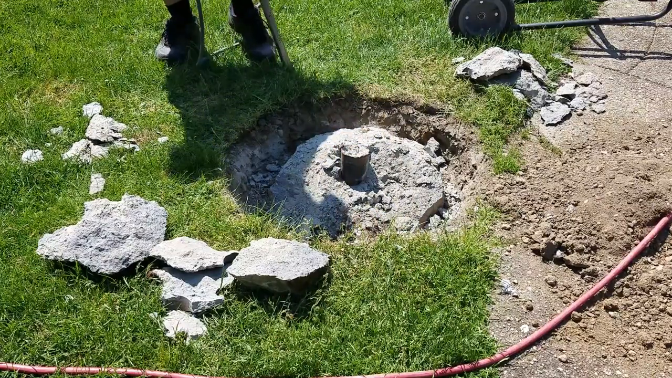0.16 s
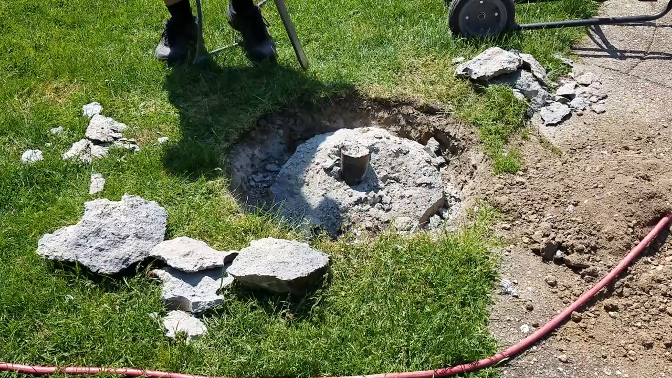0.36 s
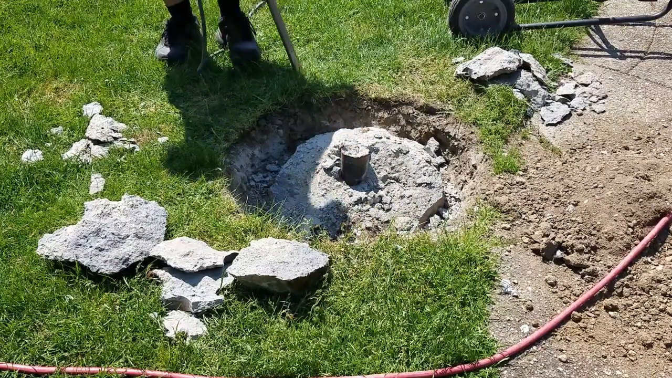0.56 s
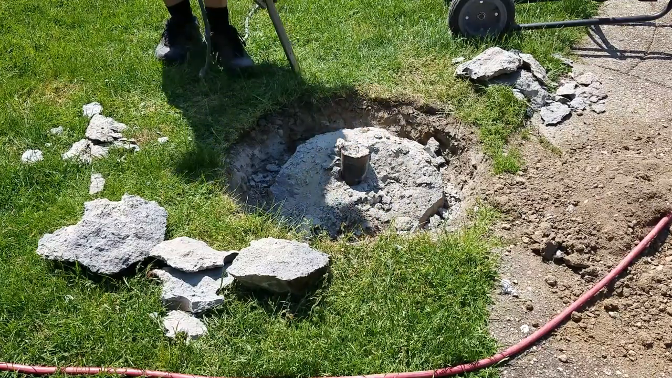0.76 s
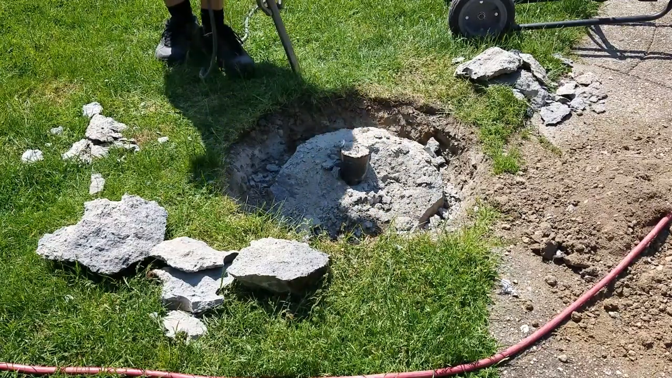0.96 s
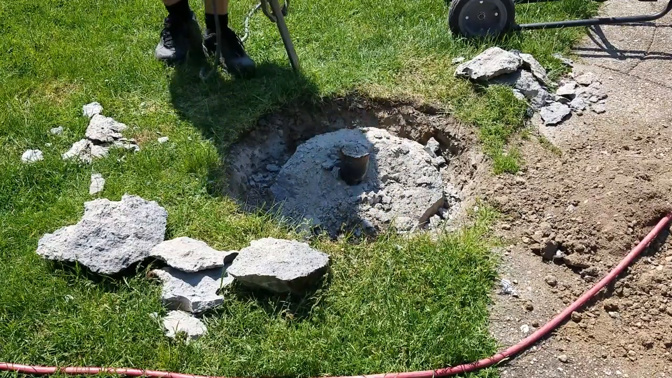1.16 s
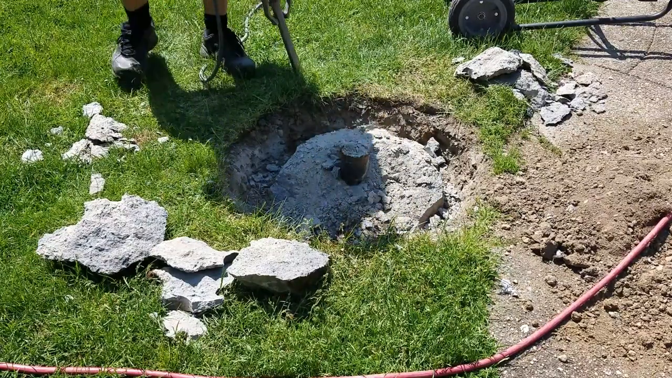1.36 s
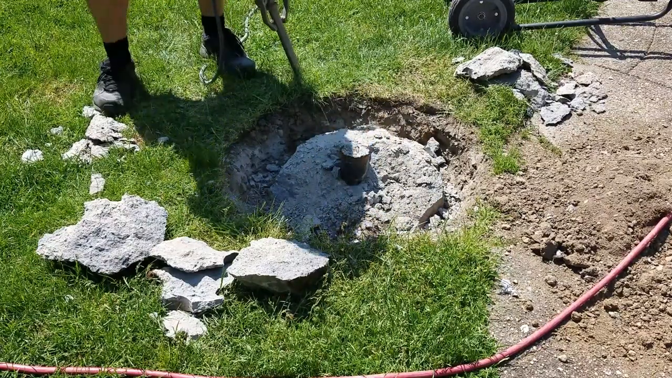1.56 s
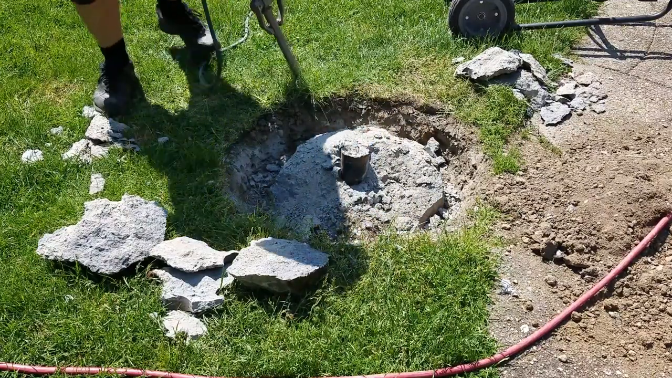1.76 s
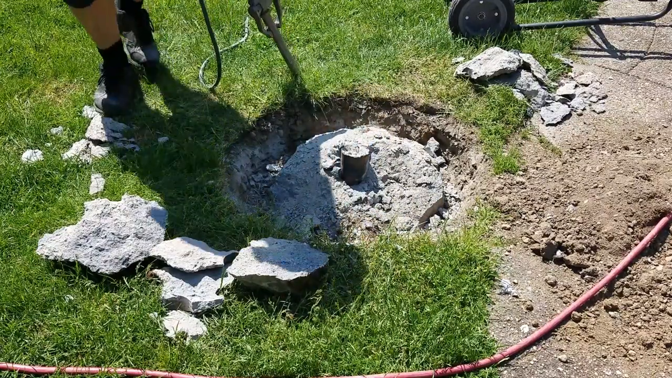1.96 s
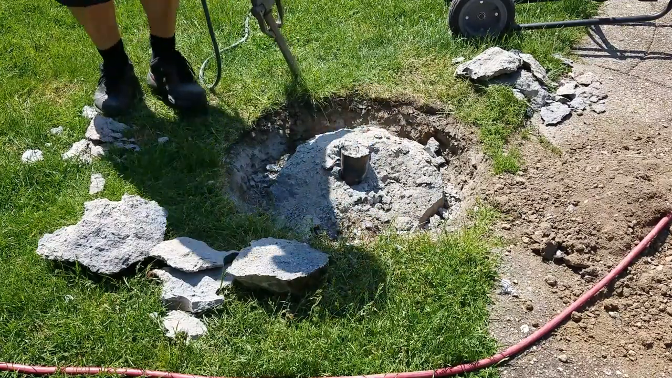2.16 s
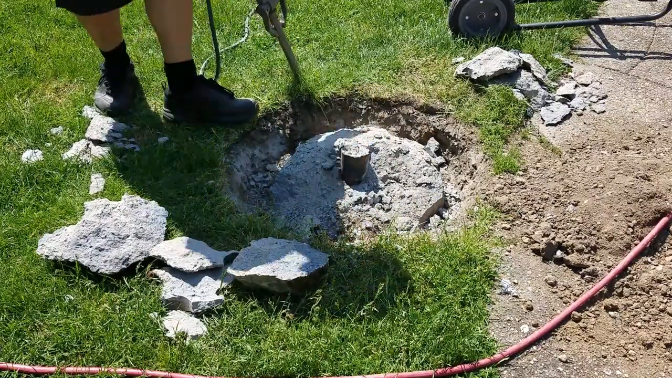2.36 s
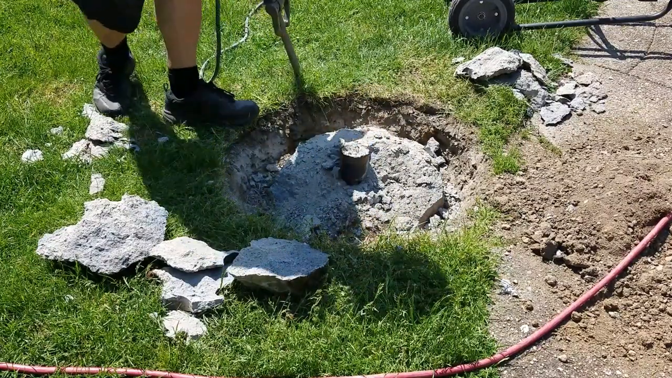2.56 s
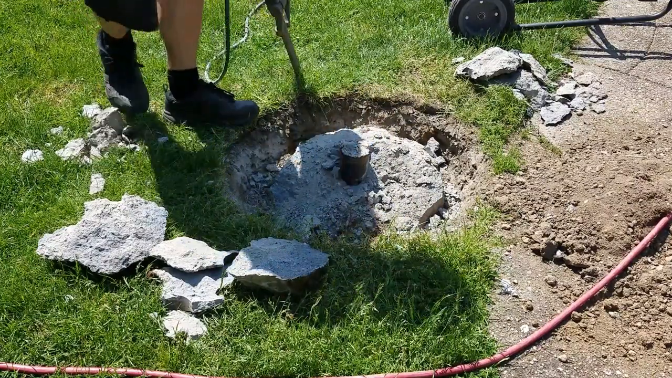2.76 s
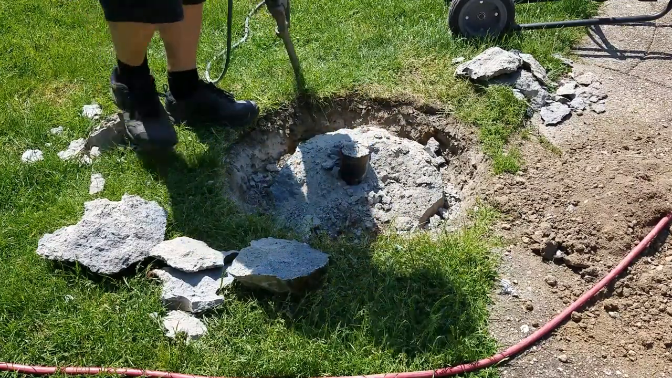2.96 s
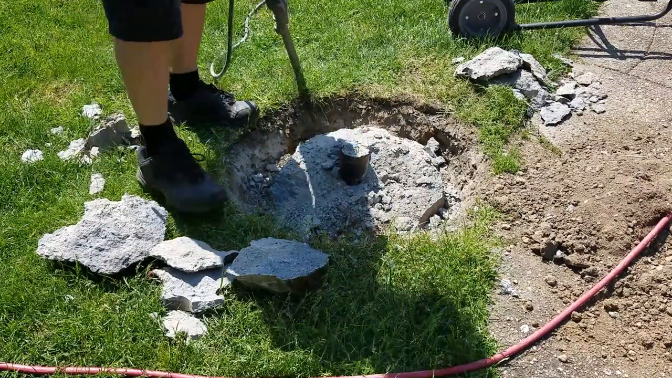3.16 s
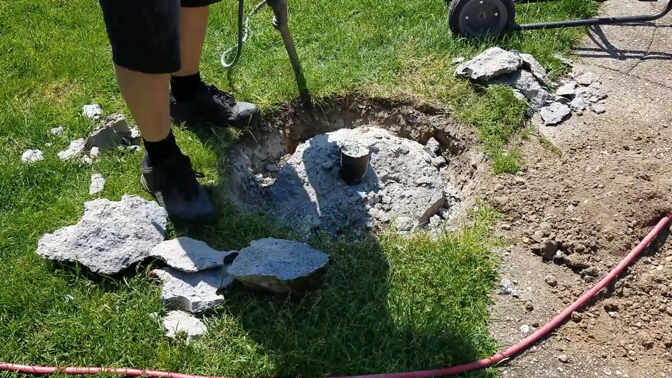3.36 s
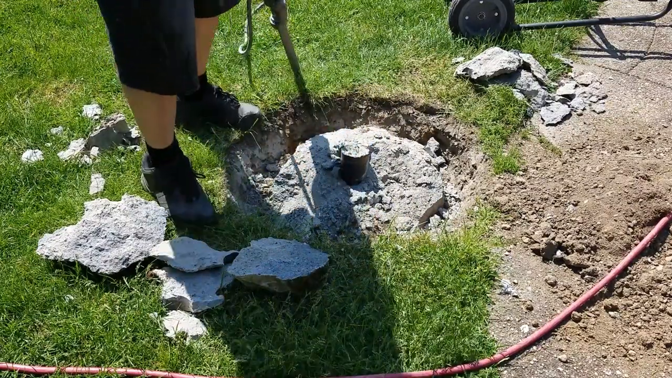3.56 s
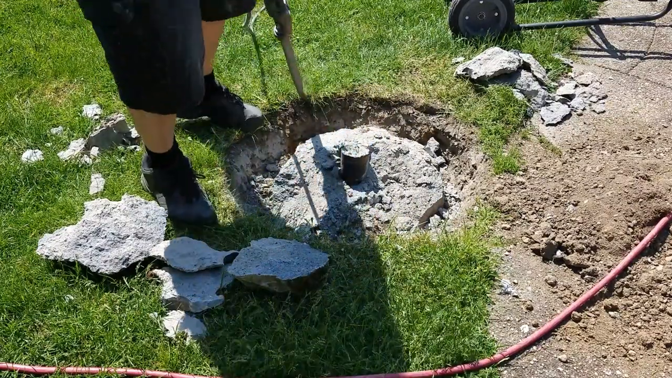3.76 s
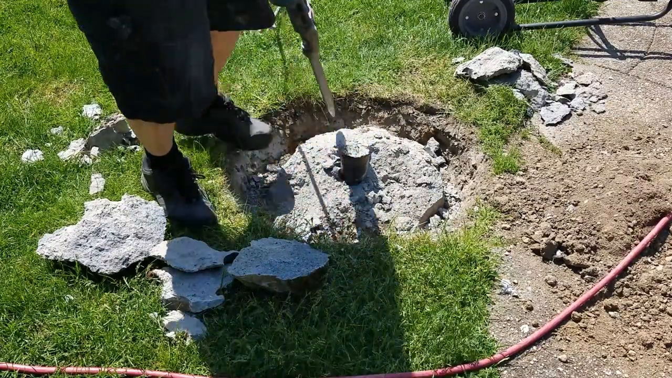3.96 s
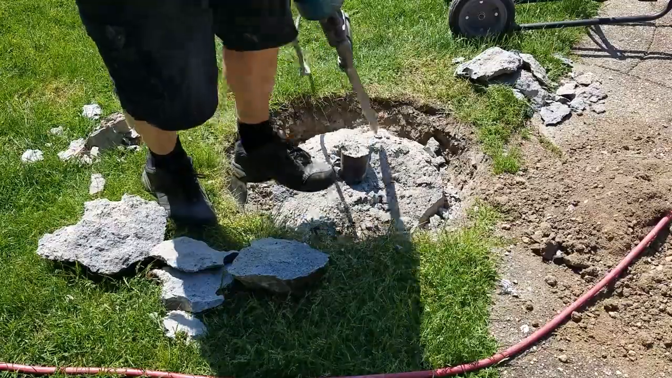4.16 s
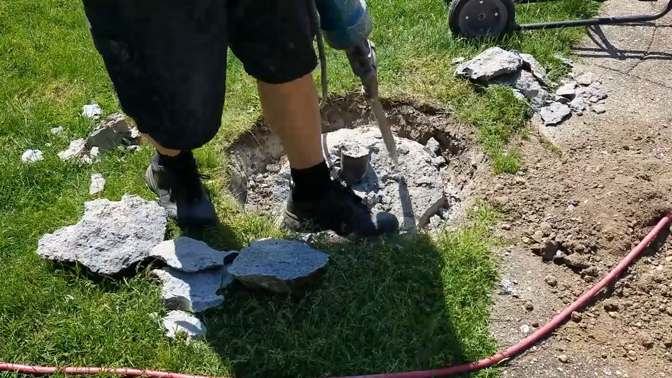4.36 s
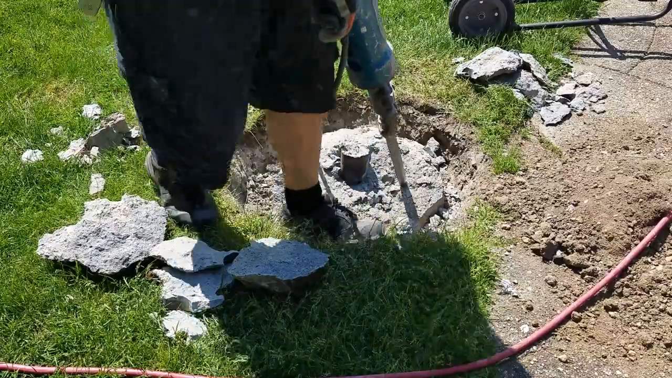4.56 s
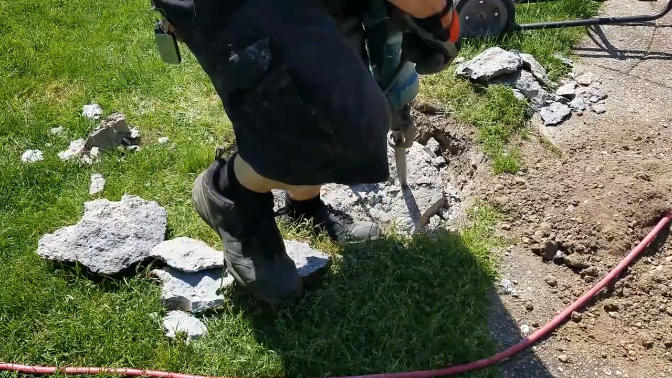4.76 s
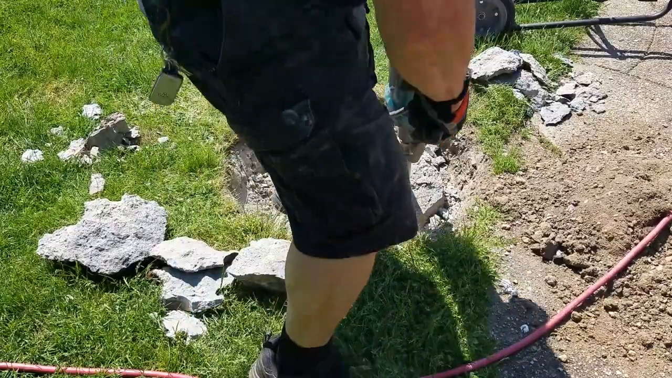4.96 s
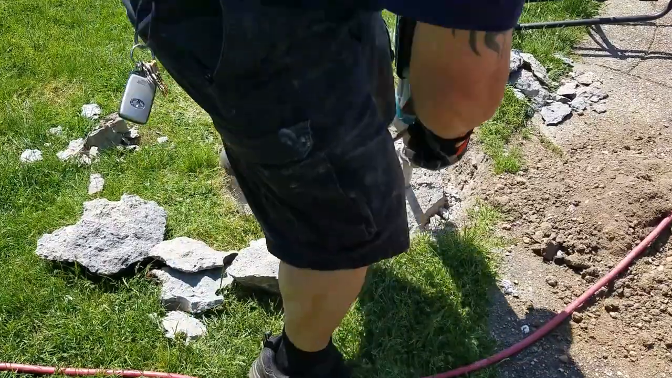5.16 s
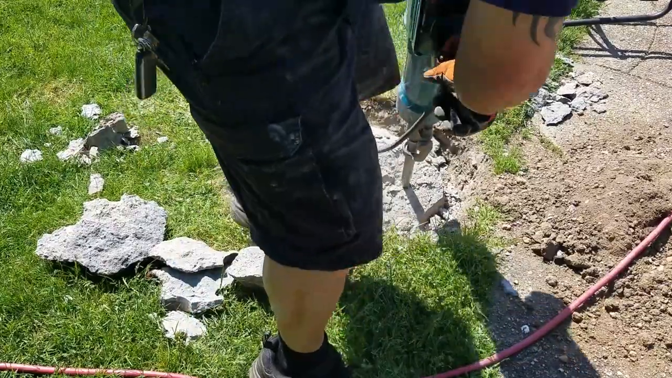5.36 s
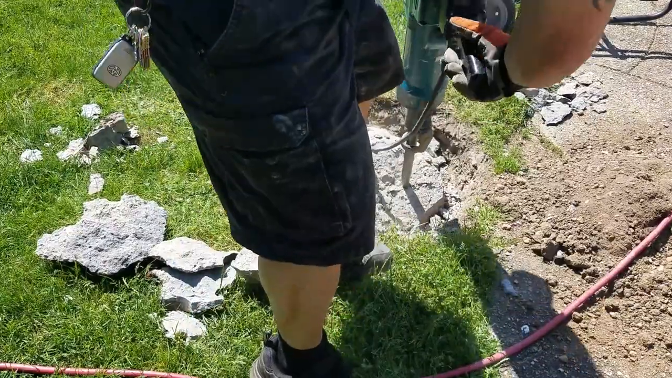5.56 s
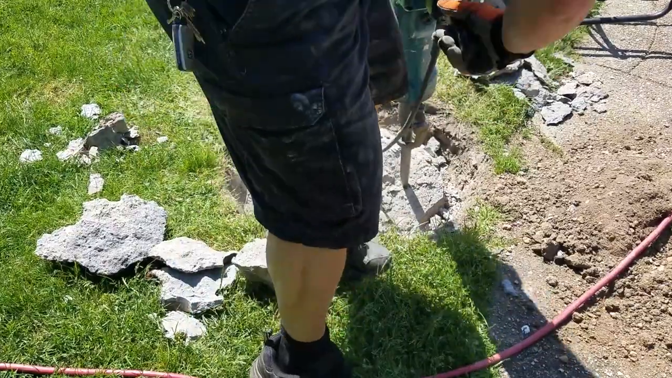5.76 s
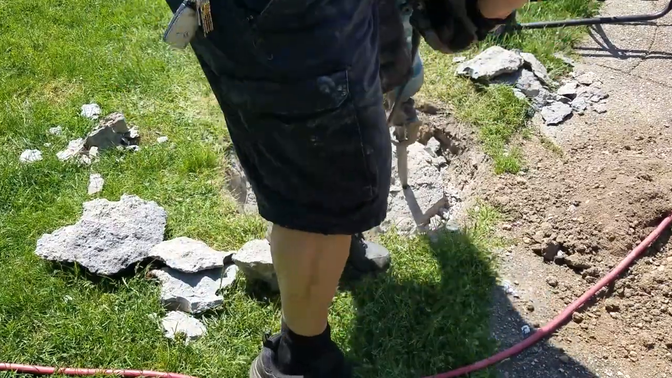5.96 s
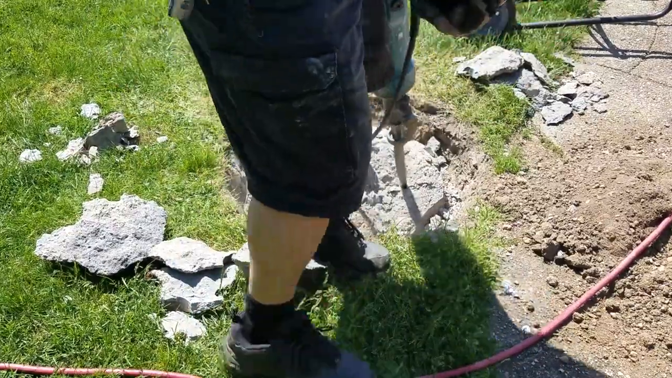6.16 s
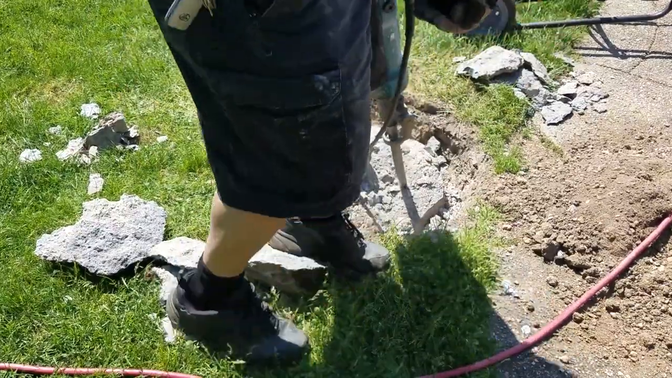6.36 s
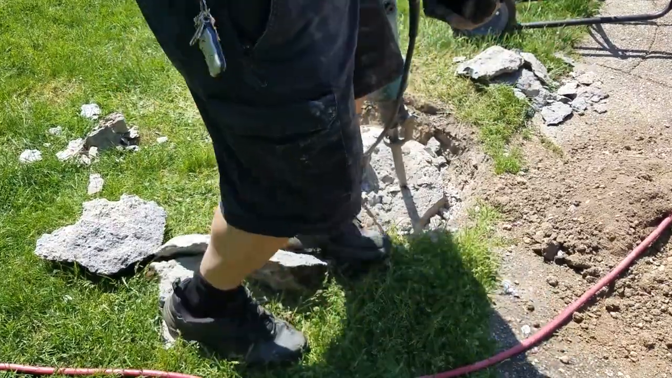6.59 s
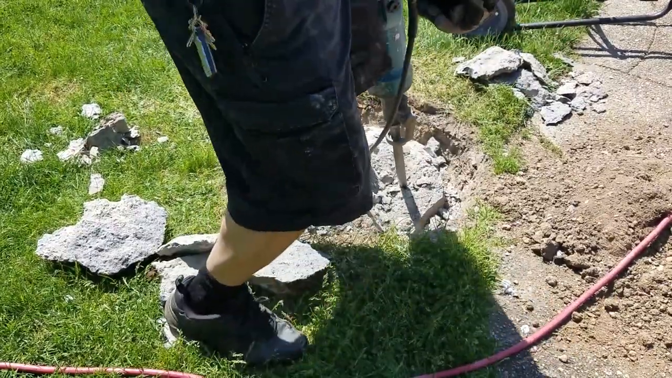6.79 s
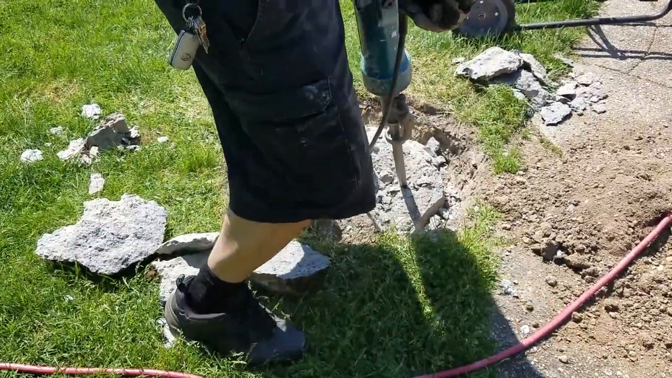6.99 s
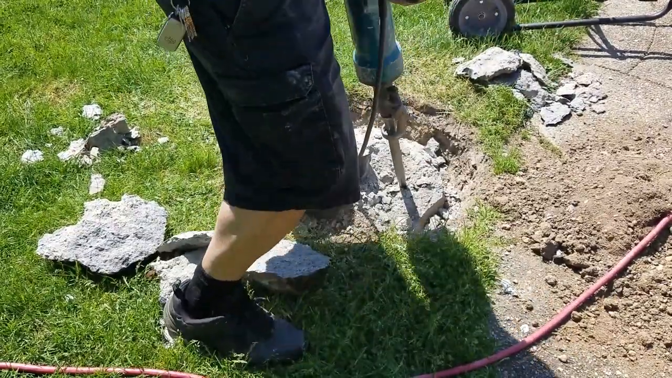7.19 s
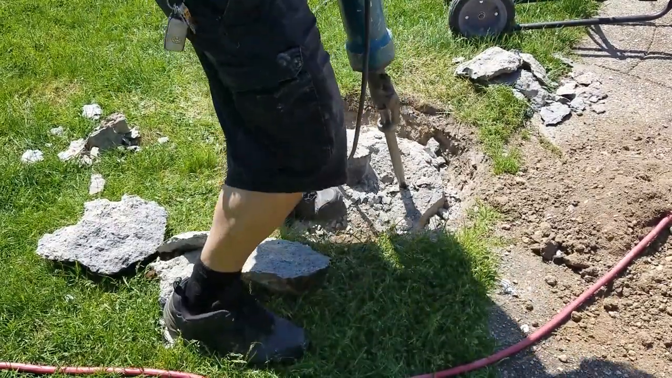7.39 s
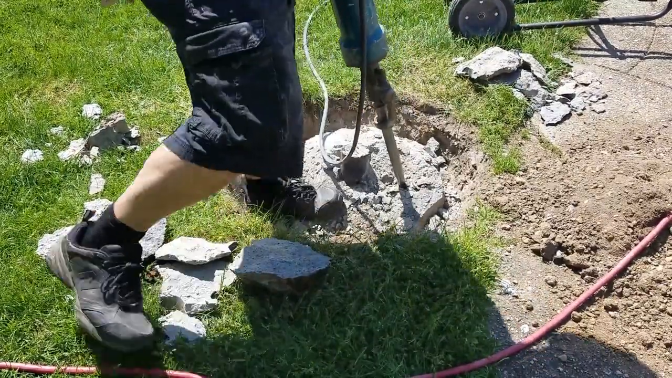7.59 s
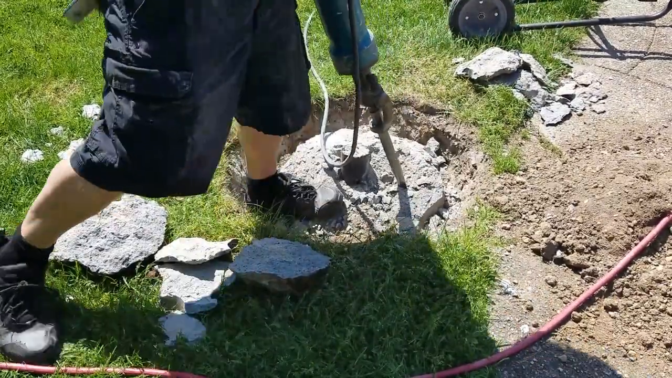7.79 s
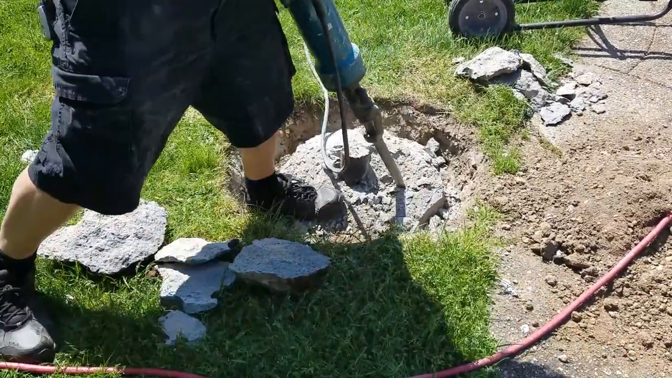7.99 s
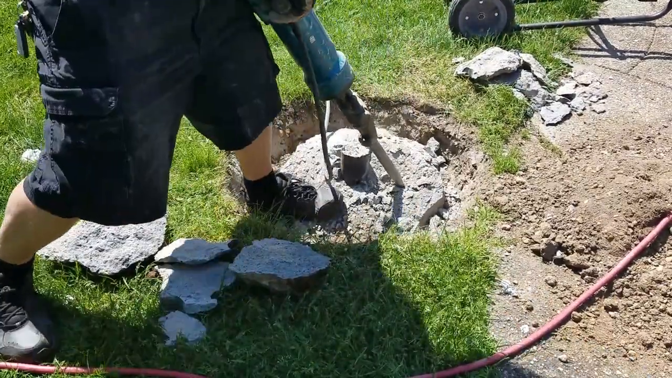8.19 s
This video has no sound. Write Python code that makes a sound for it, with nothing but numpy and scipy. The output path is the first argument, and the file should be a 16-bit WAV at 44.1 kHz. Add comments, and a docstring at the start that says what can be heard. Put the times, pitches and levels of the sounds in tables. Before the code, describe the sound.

An electric jackhammer winds down with slowing metallic clanks, knocks over rubble, then its trigger snaps and it hammers concrete steadily in a yard.

```python
"""In a yard between house walls, an electric jackhammer coasts down near a stereo pair of microphones. Gears
grind as noise and crank-locked tones; the loose chisel clanks as damped steel modes, at mostly widening
intervals. Tip and boots knock and crunch on rubble as resonant noise; a slab grates, keys jingle, a small bird
whistles. A trigger snaps; the motor spins up and hammers about sixteen times a second, its blows timed by the
crank. Every blow is a crack of noise, a sounding footing and a ringing chisel; the walls answer softly."""
import sys
import numpy as np
from scipy import signal
from scipy.fft import rfft, irfft, next_fast_len
from scipy.io import wavfile
from scipy.ndimage import map_coordinates

SR = 44100
rng = np.random.default_rng(int(sys.argv[2]) if len(sys.argv) > 2 else 0)


def master(y):
    """Save y as 16-bit WAV."""
    cut = np.clip(np.atleast_2d(y).T, -1, 1)
    pcm = np.round(cut * 32767)  # scale
    wavfile.write(sys.argv[1], SR, pcm.astype(np.int16))


N = 362943
TIME = np.arange(N) / SR  # seconds through the scene
AGE = np.arange(SR // 3) / SR  # seconds since a contact

# All table levels are relative; the functions trim and mix them.


def amp(db):
    """Amplitude factor of a level in dB."""
    return 10 ** (np.asarray(db) / 20)


def unit(x):
    """Scale to rms 1."""
    return x / np.sqrt(np.mean(x ** 2) + 1e-20)


def along(points, hz):
    """Read (Hz, value) points on a log frequency axis."""
    f, v = np.transpose(points)
    return np.interp(np.log(hz + 1), np.log(f + 1), v)


def at(rows, s):
    """The columns of a timed table at s, a moment or an array of times."""
    times, *cols = np.transpose(rows)
    return [np.interp(s, times, c) for c in cols]


def curves(rows):
    """One value per sample for each column after the time."""
    return at(rows, TIME)


def wobble(rate):
    """A smooth random curve with rate knots a second."""
    return map_coordinates(rng.standard_normal(int(N * rate / SR) + 4), [TIME * rate])


def filtered(x, response):
    """Multiply the spectrum of x by a response of frequency."""
    n = x.shape[-1]
    m = next_fast_len(n + SR // 8)
    return irfft(rfft(x, m) * response(np.fft.rfftfreq(m, 1 / SR)), m)[..., :n]


# Likeness of the two microphones: pitch_hz, likeness (1 = identical)
LIKENESS = [(400, 0.96), (1400, 0.8), (3100, 0.686), (6500, 0.19), (15000, 0.3)]


def stereo_angle(hz):
    """Angle whose cosine is the likeness of left and right."""
    return np.arccos(np.clip(along(LIKENESS, hz), -1, 1))


def noise(gain, size):
    """Stereo noise of rms 1, alike in the bass and largely unrelated in the treble."""
    def mid_and_side(hz):
        turn = stereo_angle(hz) / 2
        return gain(hz) * np.array([np.cos(turn), np.sin(turn)])

    mid, side = filtered(rng.standard_normal((2, size)), mid_and_side)
    return unit(np.array([mid + side, mid - side]))


def rush(spectrum, size=len(AGE)):
    """Noise with a (Hz, dB) spectrum."""
    return noise(lambda hz: amp(along(spectrum, hz)), size)


def coloured(spectrum, uneven_db, count=110):
    """Noise of one contact: every spot that is struck has its own peaks and gaps."""
    peaks = np.transpose([np.geomspace(300, 16000, count), uneven_db * rng.standard_normal(count)])
    return noise(lambda hz: amp(along(spectrum, hz) + along(peaks, hz)), len(AGE))


def resonant(peaks, size=len(AGE)):
    """Noise in (Hz, width Hz, dB) resonances, summed with alternating sign."""
    def response(f):
        total = 0
        for k, (centre, width, db) in enumerate(peaks):
            total = total + (-1) ** k * amp(db) * 1j * f * width / (centre * centre - f * f + 1j * f * width)
        return abs(total)

    return noise(response, size)


def fade(t60, attack):
    """Envelope of a struck thing: a soft onset, then a 60 dB decay in t60 seconds."""
    return np.exp(-np.log(1000) * AGE / t60) * (1 - np.exp(-AGE / attack))


def add(track, s, sound):
    """Mix a sound into the track at s seconds."""
    part = track[:, round(s * SR):][:, :len(AGE)]
    part += sound[..., :part.shape[1]]


# Spectrum of the yard's hum: pitch_hz, level_db
YARD_SPECTRUM = [(25, -20), (75, 3), (180, -10), (370, 4), (500, -7.5), (640, -4.5), (1200, -24.5),
                 (6000, -44.5), (16000, -40)]
# Level of the yard's hum in the mix: dips after the jolt, recovers, then changes under the motor:
# start_s, level_db
YARD_LEVEL = [(.9, -42.5), (1.45, -60.5), (2.25, -44.5), (4, -40.5), (5.5, -42.5), (6, -46.5)]


def yard():
    """The yard's hum is shaped noise; its level in the mix follows a curve with a slow random waver."""
    return amp(curves(YARD_LEVEL)[0] + 2.4 * wobble(3.21)) * rush(YARD_SPECTRUM, N)


# Switched off, the crank loses speed to drag and dry friction.
COAST_TURNS_PER_S, DRAG_S, FRICTION_TURNS_PER_S2 = 14.0, 2.9, .9
# One full stroke jolts the tool and brakes the crank.
JOLT_S, JOLT_LOSS_TURNS_PER_S = .907, 1.0


def coast_speed():
    """Crank turns a second as drag and dry friction stop the tool."""
    drift = FRICTION_TURNS_PER_S2 * DRAG_S
    speed = (COAST_TURNS_PER_S + drift) * np.exp(-TIME / DRAG_S) - drift
    return np.maximum(speed - JOLT_LOSS_TURNS_PER_S * (TIME > JOLT_S), 0)


# Gear mesh and fan tones: crank_multiple, coasting_db, powered_db
GEAR_TONES = [(98.8, -5, -8), (107.9, 1.5, 0), (186, -8, -21), (200, 0.5, -3)]


def whine(speed, powered, flutter, waver_db):
    """Gear mesh and fan tones, tied to the crank speed."""
    turns = np.cumsum(speed * (1 + flutter * wobble(400))) / SR
    tones = 0
    for multiple, coast_db, power_db in GEAR_TONES:
        level_db = (power_db if powered else coast_db) + waver_db * wobble(35)
        tones = tones + amp(level_db) * np.sin(2 * np.pi * multiple * turns)
    return unit(tones)


# Level of the grinding gears: start_s, level_db
GRIND_LEVEL = [(0, -21), (.89, -28), (.93, -42), (1.45, -46.5), (2.15, -38), (3.1, -45), (4.2, -61.5)]
# Spectrum of gears turning fast: pitch_hz, level_db
FAST_GEARS = [(200, -17.5), (390, -0.5), (620, -6.5), (740, -1.5), (1020, -7), (1500, 0.5), (2020, -7.5),
              (2610, -6.5), (4000, -13.5), (8500, -25.5), (16000, -41)]
# Spectrum of gears turning slowly: pitch_hz, level_db
SLOW_GEARS = [(220, -43), (400, 6), (560, -31), (740, -0.5), (1000, -2), (1680, 0.5), (2350, -16.5),
              (2700, -9.5), (3800, -15.5), (14000, -47)]
# Housing resonances: pitch_hz, width_hz, level_db
HOUSING = [(394.5, 30, -4.5), (529, 15.3, -6), (723, 29, -0.5), (1393, 88, -5.5), (1556, 78, -4.5),
           (2030, 55, -8.5)]
# Low shake of the tool: pitch_hz, level_db
RUMBLE = [(25, -29), (75, 1), (210, -12.5), (500, -51.5)]
# Below SHAKE_TURNS_PER_S the shake loses SHAKE_LOSS_DB for each turn a second.
SHAKE_DB, SHAKE_TURNS_PER_S, SHAKE_LOSS_DB = -34.5, 9.2, 7.5


def coasting():
    """Unpowered gears grind; as they slow, they rattle and the housing's own notes come forward."""
    speed, (grind_db,) = coast_speed(), curves(GRIND_LEVEL)
    fast = np.clip(speed / 10, 0, 1) ** 2
    teeth = unit(amp(3.2 * wobble(450) + 2.4 * wobble(60)))
    rattle = unit(amp(1.5 * wobble(200) + 6.1 * wobble(24.98)))
    grind = np.sqrt(fast) * teeth * rush(FAST_GEARS, N)
    grind = grind + np.sqrt(1 - fast) * rattle * rush(SLOW_GEARS, N)
    housing = amp(-4.5 - 3.7 * fast) * resonant(HOUSING, N)
    tones = amp(-8.5) * fast * teeth * whine(speed, False, flutter=.014, waver_db=4)
    shake_db = SHAKE_DB - SHAKE_LOSS_DB * np.maximum(SHAKE_TURNS_PER_S - speed, 0)
    running = np.clip((4.6 - TIME) / 0.32, 0, 1)
    return running * (amp(grind_db + 1) * (grind + housing + tones) + amp(shake_db) * rush(RUMBLE, N))


# Chisel modes: pitch_hz, loose_db, pressed_db (on concrete), t60_s (at damping 1)
CHISEL_MODES = [(2720, -8, -10, .06), (2850, -11, -7, .08), (4360, -9, -8, .08), (4540, -6, -8, .08),
                (5278, -2, -9, .15), (6240, -8, -14, .08), (6510, -6, -6, .08), (8345, -13, -17, .13),
                (8800, -15, -15, .13), (10330, -15, -6, .3), (11256, -21, -13, .3), (13846, -21, -11, .3),
                (15015, -14, 2, .2)]


def chisel(pressed, scatter_db, damping, chatter, detune):
    """One ring of the steel bar; its seat in the holder shifts every mode, and its chatter blurs them."""
    ring = np.zeros((2, len(AGE)))
    clock = AGE + chatter * np.cumsum(rng.standard_normal(len(AGE))) / SR
    for hz, loose_db, pressed_db, t60 in CHISEL_MODES:
        apart = stereo_angle(hz) * rng.standard_normal() * np.array([[.5], [-.5]])
        level_db = (pressed_db if pressed else loose_db) + scatter_db * rng.standard_normal()
        note = hz * (1 + detune * rng.standard_normal())
        wave = np.sin(2 * np.pi * (note * clock + rng.random()) + apart)
        ring += amp(level_db) * fade(t60 / damping, 0.00058) * wave
    return ring


# The loose chisel clanks in its holder:
# start_s, level_db, steel_db, damping (divides each mode's t60), rattle_db (after-rattle)
CLANKS = [(0.4888, -4, -11, 5.5, -28), (0.5387, -9, -9.5, 4, -32), (0.7825, -11, -6.5, 3.1, -30),
          (0.9085, 1.5, -4.5, 1.5, -22), (1.0075, -6, -7, 3.6, -36.5), (1.1347, -8, -3, 1.8, -22),
          (1.262, -6.5, -4.5, 4.4, -28), (1.4116, -7, -4, 6, -28.5), (1.579, -9, -10.5, 5.7, -31.5),
          (1.7676, -9.5, -12.5, 5.9, -34), (1.986, -7, -17, 6.5, -32), (2.2263, 0, -17.5, 5, -35),
          (2.5072, -6, -15, 6.8, -27.5), (2.8598, -11.5, -11.5, 4, -30), (3.1607, -11, -27, 4.5, -41.5),
          (3.1968, -7, -33.5, 5, -46), (3.3985, -17.5, -32, 4.6, -36), (3.82, -22.5, -30, 2.2, -32)]
# Dull part of a clank: pitch_hz, level_db
CLANK_BODY = [(60, -33), (200, -9.5), (800, 2), (1400, 5.5), (2800, -2.5), (9000, -24.5)]
# Steely part of a clank: pitch_hz, level_db
CLANK_TOP = [(1500, -30), (2800, 9), (3600, -2), (4450, 8), (5750, -4.5), (6400, 9), (7500, -6.5),
             (8600, 6), (9700, -18.5), (15500, -9.5)]
# The chisel drops back after a jolt: mean delay and spread.
REBOUND_S, REBOUND_SPREAD_S = .0115, 0.0011
# A clank flutters between two walls: round trip, first answer, loss a trip.
SLAP_S, SLAP_DB, SLAP_LOSS_DB = .0365, -20, 4.5


def clanks():
    """The idling piston nudges the free chisel, which rings damped by its holder, rebounds and rattles to rest."""
    out = np.zeros((2, N))
    for s, db, steel_db, damping, rattle_db in CLANKS:
        thump = coloured(CLANK_BODY, uneven_db=4.0) * fade(0.041, 0.0013)
        body = amp(-10.0) * (thump + amp(-11.5) * resonant(HOUSING) * fade(0.16, 0.0014))
        ring = chisel(False, scatter_db=1.5, damping=damping, chatter=0.021, detune=0.0026)
        steel = coloured(CLANK_TOP, uneven_db=7.5) * fade(0.032, 0.0018) + amp(-4) * ring
        add(out, s - .0004, amp(db) * (body + amp(steel_db + 3.5) * steel))

        rebound = coloured(CLANK_TOP, uneven_db=1.5) * fade(0.017, 0.0005)
        add(out, s + rng.normal(REBOUND_S, REBOUND_SPREAD_S), amp(db + steel_db - 13) * rebound)

        grains = unit(amp(3.5 * wobble(349) + 4.1 * wobble(70)))[:len(AGE)]
        rattle = grains * noise(lambda hz: (hz + 500) ** -.5, len(AGE)) * fade(0.5, .006)
        add(out, s, amp(db + rattle_db - 5) * rattle)

        for trip in range(3):
            answer = coloured(CLANK_BODY, uneven_db=6.5)
            answer = answer + amp(steel_db + 5) * coloured(CLANK_TOP, uneven_db=8.0)
            answer_db = db + SLAP_DB - SLAP_LOSS_DB * trip
            add(out, s + (trip + 1) * SLAP_S, amp(answer_db) * answer * fade(0.04, 0.0019))
    jolt = np.array([rush(RUMBLE)[0], rush(RUMBLE)[1]])  # unrelated at the two microphones
    add(out, JOLT_S, amp(-11) * jolt * fade(0.08, .002))
    return out


RATTLES_PER_S, RATTLE_DB = 22, -35.5


def rattles():
    """Slack gears tap against each other at random moments of the last slow turns, ever more softly."""
    out = np.zeros((2, N))
    start_s, end_s = 1.95, 3.3
    for when, size in rng.random((round(RATTLES_PER_S * (end_s - start_s)), 2)):
        s = start_s + when * (end_s - start_s)
        tap = coloured(SLOW_GEARS, uneven_db=8.5) * fade(0.12, 0.0018)
        add(out, s, amp(RATTLE_DB + 2.8 * size - 9.4 * when) * tap)
    return out


# A thin tone sinks during the rotor's last turns: start_s, pitch_hz, level_db
LAST_TONE = [(2.9, 1780, -66), (3.2, 1720, -56.5), (3.9, 1526, -62)]


def last_tone():
    """A thin, wavering sine sinks during the rotor's last turns."""
    hz, db = curves(LAST_TONE)
    sounding = (TIME > LAST_TONE[0][0]) & (TIME < LAST_TONE[-1][0])
    tone = np.sin(2 * np.pi * np.cumsum(hz * (1 + .012 * wobble(150))) / SR)
    return sounding * amp(db + 2.5 * wobble(30)) * tone


# Chisel tip and boots knock on the rubble:
# start_s, level_db, pitch_hz (stone), scrape_db, ring_db (steel), t60_s (stone)
KNOCKS = [(4.37, -8.5, 918, -2.5, -2.5, 0.047), (4.376, -5, 833, -5.5, -7, 0.067),
          (4.458, -16, 905, -6, -13.5, 0.13), (4.521, -5.5, 917, -2.5, -7, 0.067),
          (4.535, -6.5, 377, -8.5, -26, .14), (4.584, -17, 418, -14, -20, .17),
          (4.724, -2, 770, -13.5, -42.5, 0.026), (4.746, 0.5, 451, -34.5, -45, 0.023),
          (4.758, -8, 352, -27, -41, 0.073), (5.37, -27, 396, -5, -27, 0.068)]
# Scraping grit: pitch_hz, level_db
SCRAPE = [(150, -15), (400, 4), (900, 8.5), (1600, 3), (5000, -10), (15000, -26.5)]
# Boots shuffle over grit: start_s, level_db
SHUFFLE = [(4.2, -87), (4.235, -45), (4.33, -35.5), (4.4, -27.5), (4.62, -44.5), (4.83, -42), (5.05, -55.5),
           (5.5, -52.5)]


def rubble():
    """Loose slabs knock hollowly and the steel tip rings on them; grit crunches in grains under tip and boots."""
    stones, scrapes = np.zeros((2, 2, N))
    tip = [(2810, 150, -9.0), (3110, 240, -0.5), (4460, 250, -1.5), (5300, 300, -3)]
    for s, db, hz, scrape_db, ring_db, t60 in KNOCKS:
        hollow = np.sin(2 * np.pi * hz * AGE) + 1.1 * resonant([(hz, 200, 0), (hz * 2.0, 250, -9)])
        add(stones, s, amp(db - 11) * hollow * fade(t60, 0.003))
        scraping = fade(t60 * 0.64, 0.0023) + amp(-22.5) * fade(t60 * 2, .01)
        add(scrapes, s, amp(db + scrape_db + 2.5) * coloured(SCRAPE, uneven_db=4.5) * scraping)
        add(stones, s, amp(db + ring_db) * resonant(tip) * fade(0.03, 0.002))
    shuffle = amp(curves(SHUFFLE)[0]) * (TIME > SHUFFLE[0][0]) * rush(SCRAPE, N)
    grains = unit(amp(2.6 * wobble(900) + 2.7 * wobble(70)))
    return stones + grains * (scrapes + shuffle)


# A tilting slab grates hollowly on its neighbour: start_s, pitch_hz, level_db
SLAB = [(4.76, 597, -59.5), (4.778, 693, -32.5), (4.794, 733, -21), (4.806, 873, -23), (4.825, 783, -28),
        (4.87, 740, -55)]
# Cracking and grating concrete: pitch_hz, level_db
CRACK = [(40, -37), (250, -12), (500, -4), (1400, 0), (3000, -4), (4500, -14), (8000, -24)]
# The grit between the slabs gives way: moment, level, width.
SLAB_GRATE_S, SLAB_GRATE_DB, SLAB_GRATE_WIDTH_S = 4.804, -28.5, 0.011


def slab():
    """A slab tilts under a boot: its hollow note rises with the pressure and sinks again."""
    hz, db = curves(SLAB)
    note = np.sin(2 * np.pi * np.cumsum(hz * (1 + 0.098 * wobble(500))) / SR) * amp(2 * wobble(250))
    grate = amp(SLAB_GRATE_DB) * np.exp(-((TIME - SLAB_GRATE_S) / SLAB_GRATE_WIDTH_S) ** 2)
    moving = (TIME > SLAB[0][0]) & (TIME < SLAB[-1][0])
    return moving * (amp(db) * note + grate * rush(CRACK, N))


# Keys on the belt: start_s, level_db
KEY_TICKS = [(4.881, -27), (5.009, -26), (5.1657, -40)]
BRIGHT = [(500, -12.0), (7000, -5.5), (14000, 1.0)]  # small hard contacts: pitch_hz, level_db


def keys():
    """Keys on the belt tick brightly, with a faint jingle of high resonances."""
    out = np.zeros((2, N))
    for s, db in KEY_TICKS:
        jingle = resonant([(10600, 40, 0.034), (12000, 40, 0.063), (14220, 430, 2)]) * fade(0.33, 0.00083)
        add(out, s, amp(db) * (rush(BRIGHT) * fade(0.057, .0012) + amp(-23) * jingle))
    return out


# Bird notes: start_s, length_s, start_hz, middle_hz, end_hz, level_db
CHIRPS = [(5.037, 0.072, 3600, 3780, 4040, -56), (5.182, 0.081, 3800, 4090, 4160, -52),
          (5.3, 0.079, 4500, 4080, 3100, -51), (5.448, .055, 4000, 4300, 3600, -45)]


def bird():
    """Short, quavering sine whistles glide through three pitches, midway between the microphones."""
    out = np.zeros((2, N))
    for s, length, start_hz, middle_hz, end_hz, db in CHIRPS:
        progress = np.clip(AGE / length, 0, 1)
        glide = np.polyfit([0, .5, 1], [start_hz, middle_hz, end_hz], 2)
        hz = np.polyval(glide, progress) * (1 + 0.02 * wobble(351)[:len(AGE)])
        add(out, s, amp(db) * np.sin(np.pi * progress) ** 2 * np.sin(2 * np.pi * np.cumsum(hz) / SR))
    return out


def trigger():
    """The trigger snaps shut with one short, bright burst."""
    out = np.zeros((2, N))
    add(out, 5.5055, amp(-17.0) * rush(BRIGHT) * fade(0.024, 0.00054))
    return out


# Crank under power, one blow a turn: start_s, speed_turns_per_s
CRANK = [(5.5, 4.8), (5.66, 11.3), (5.745, 13.4), (5.79, 14.45), (5.86, 15.4), (5.925, 15.8), (5.99, 16.55),
         (6.15, 17.4), (6.33, 16.11), (6.75, 16.07), (7.24, 16.45), (7.55, 15.99), (8.23, 16.21)]
FIRST_BLOW_S = 5.6775


def crank_turns():
    """Turns of the powered crank, counted from the first blow."""
    turns = np.cumsum(curves(CRANK)[0]) / SR
    return turns - np.interp(FIRST_BLOW_S, TIME, turns)


# Motor under power: start_s, whirr_db, grit_db
DRIVE = [(5.5, -23, -62.5), (5.62, -23, -42.5), (5.7, -19.5, -37), (5.88, -20.5, -31.5),
         (6.05, -25.5, -34.5), (6.6, -31, -32.5), (6.9, -30.5, -39.5), (7.3, -28.5, -36),
         (8.23, -30.5, -38.5)]
# Whine under power, strongest while the motor spins up: start_s, level_db
WHINE_LEVEL = [(5.58, -48), (5.68, -26), (5.89, -24), (6.05, -35), (8.23, -39)]
# The housing lets the whine out best near its resonances: pitch_hz, level_db
WHINE_COLOUR = [(1700, 2), (2300, -5), (2800, -9), (3150, 2)]
# Motor whirr: pitch_hz, level_db
MOTOR = [(200, -21), (600, -4), (710, 0.5), (1040, -5), (1450, -5), (2060, -4), (4200, -21.5),
         (16000, -44.5)]
# Flying grit and chips: pitch_hz, level_db
GRIT = [(2000, -15.5), (4300, -1.5), (6700, -1.5), (9300, -10.5), (10800, -5), (12400, -14), (14500, -2.5),
        (16000, -21)]


def motor():
    """The motor whirrs and whines hardest while the piston compresses air; grit swells soon after each blow."""
    (speed,), (whirr_db, grit_db), (whine_db,) = curves(CRANK), curves(DRIVE), curves(WHINE_LEVEL)
    turns, hammers = crank_turns(), TIME > FIRST_BLOW_S
    load = np.cos(2 * np.pi * (turns - .78)) * hammers
    slack = np.exp(40 * (np.cos(2 * np.pi * (turns + .03)) - 1)) * hammers
    whirr = rush(MOTOR, N) + amp(-6) * resonant(HOUSING, N)
    whirr = whirr * unit(amp(1.1 * wobble(400) + 2.64 * wobble(70)))
    tones = whine(speed, True, flutter=0.019, waver_db=3.5)
    tones = filtered(tones, lambda hz: amp(along(WHINE_COLOUR, hz))) * unit(amp(1.5 * wobble(300)))
    grit = rush(GRIT, N) * unit(amp(1.4 * wobble(600) + 4.5 * wobble(65)))
    mix = amp(whirr_db + 2.4 * load) * whirr + amp(whine_db + 4.2 * load) * tones
    mix = mix + amp(grit_db - 1.3 * load + 4.0) * grit
    running = np.clip((TIME - 5.506) / 0.0021, 0, 1)
    return running * amp(-5 * slack) * mix  # a lull while the striker flies free


# How the chisel bears on the concrete; seated well it thuds, loose it rings:
# start_s, level_db (blow), thud_db, ring_db
BEARING = [(5.68, -5, -18.5, -48), (5.97, -8, -5.5, -23), (6.16, -7.5, -8, -13.5), (6.56, -7, -19.5, -20.5),
           (6.71, -13, -10, -10.5), (6.86, -12, 4.5, -18.5), (7.17, -11.5, -5, -22.5),
           (7.24, -9.5, -10, -15.5), (7.38, -4, -5.5, -21.5), (7.73, -4.5, -8.5, -19.5),
           (8.17, -5.5, -18.5, -28.5)]
# The footing's note shifts as the chisel bites into a new seat: start_s, pitch_hz
FOOTING = [(7.13, 704), (7.2, 792), (7.62, 792), (7.66, 724), (7.85, 760)]
FOOTING_UPPER_HZ, FOOTING_UPPER_DB = 869, -7  # its second, weaker mode
THUD_T60_S = 0.14  # the footing rings on after each blow
THUD_SCATTER_DB, RING_SCATTER_DB = 1, 1.5  # from blow to blow
THUMP_HZ, THUMP_DB, THUMP_T60_S = 172.3, -30, 0.037  # every blow also shakes the ground
BOUNCE_S, BOUNCE_SPREAD_S, BOUNCE_DB = 0.042, 0.0017, -17.5  # the chisel bounces once more in its holder
CHIP_DB, CHIP_SCATTER_DB = -22, 4  # loose chips tick against the steel between blows


def hammering():
    """Once a turn a blow cracks concrete, sounds the footing and rings the chisel, which drops back and bounces."""
    out = np.zeros((2, N))
    free = np.exp(-(AGE / .05) ** 4)  # cuts the ring short before the next blow
    turns = crank_turns()
    for s in np.interp(np.arange(round(turns[-1])), turns, TIME):
        scatter_db = rng.standard_normal(3) * [0, THUD_SCATTER_DB, RING_SCATTER_DB]
        db, thud_db, ring_db = at(BEARING, s) + scatter_db
        crack = amp(2.5) * coloured(CRACK, uneven_db=4.5) * fade(0.021, 0.0016)
        crack = crack + amp(-17.5) * coloured(CRACK, uneven_db=9.5) * fade(0.16, 0.0035)
        chips = coloured(GRIT, uneven_db=8.5) * fade(0.016, 0.0017)

        holder = []
        for hz in (2910, 3270, 4540, 6760):
            holder.append((hz * (1 + 0.02 * rng.standard_normal()), 160, 3 * rng.standard_normal()))
        clatter_fade = fade(0.042, 0.0008) + amp(-8.5) * free * fade(0.15, 0.0065)
        clatter = amp(-12.5) * resonant(holder) * clatter_fade

        note = at(FOOTING, s)[0]
        upper = amp(FOOTING_UPPER_DB) * np.sin(2 * np.pi * FOOTING_UPPER_HZ * AGE)
        tone = np.sin(2 * np.pi * note * AGE) + upper
        thud = amp(thud_db - 4) * tone * fade(THUD_T60_S, 0.00095)
        ring = chisel(True, scatter_db=2.5, damping=0.47, chatter=0.014, detune=0.001)
        ring = ring + amp(-3) * resonant([(10800, 500, -2.0), (15050, 610, -3.0)]) * fade(0.59, .001)
        blow = crack + chips + clatter + thud + amp(ring_db + 2.0) * free * ring
        add(out, s - .0003, amp(db) * blow)

        rebound = resonant([(note, 350, 0)]) * fade(0.024, .0006)
        add(out, s + rng.normal(REBOUND_S, REBOUND_SPREAD_S), amp(db + thud_db - 3) * rebound)
        add(out, s, amp(THUMP_DB) * np.sin(2 * np.pi * THUMP_HZ * AGE) * fade(THUMP_T60_S, 0.0025))
        bounce = coloured(GRIT, uneven_db=5.5) * fade(0.043, 0.0004)
        add(out, s + rng.normal(BOUNCE_S, BOUNCE_SPREAD_S), amp(db + BOUNCE_DB) * bounce)

        for when in rng.random(size=3):
            chip = (resonant(holder) + coloured(GRIT, uneven_db=8)) * fade(.018, .0003)
            chip_db = db + CHIP_DB + CHIP_SCATTER_DB * rng.standard_normal()
            add(out, s + REBOUND_S + when * .045, amp(chip_db) * chip)
    return out


# Working position: pitch_hz, balance_db (left minus right)
NEAR_BALANCE = [(4500, -0.04), (8000, 0), (14000, -5)]


def panned(x):
    """Tilt left against right for the tool in its working position."""
    return filtered(x, lambda hz: amp(np.outer([.5, -.5], along(NEAR_BALANCE, hz))))


# The tool is carried from the left to the right of centre: start_s, left_lead_us (microseconds)
LEAD = [(0, 87), (1.1, 54), (3.6, 44), (4.4, -33.5), (6.6, -47), (8, -17.5)]


def placed(x):
    """The microphone nearer to the tool hears it a little sooner."""
    lead_s = curves(LEAD)[0] / 10 ** 6
    sides = []
    for channel, side in zip(x, (.5, -.5)):
        sides.append(map_coordinates(channel, [(TIME + side * lead_s) * SR], order=5))
    return np.array(sides)


ECHO_T60_S = 0.34


def walls(x):
    """Nearby house walls answer late and softly, as a decaying noise tail."""
    tail = rng.standard_normal((2, len(AGE))) * np.exp(-np.log(1000) * AGE / ECHO_T60_S)
    late = np.pad(x, ((0, 0), (SR // 70, 0)))
    return signal.fftconvolve(late, tail / np.linalg.norm(tail[0]), axes=1)[:, :N]


def scene():
    """The tool and rubble as they reach the microphone pair, with bird, wall echo and yard."""
    tool = coasting() + clanks() + rattles() + last_tone() + panned(motor() + hammering())
    work = placed(tool + rubble() + slab() + keys() + trigger()) + bird()
    return work + amp(-12.5) * walls(work) + yard()


# The level dips briefly: start_s, level_db
DIP = [(6.628, -.5), (6.634, -23), (6.675, -24.5), (6.684, -1.5)]
TOP_HZ = 15900  # middle of the upper band edge


def record(dry):
    """A brief dip in level, softly rounded peaks and the band limit."""
    x = dry * amp(curves(DIP)[0])
    x = x / (1 + x ** 4) ** .25
    return filtered(x, lambda hz: np.clip((TOP_HZ - hz) / 300 + .5, 0, 1))


dry = scene()
out = record(dry)
master(out)
```